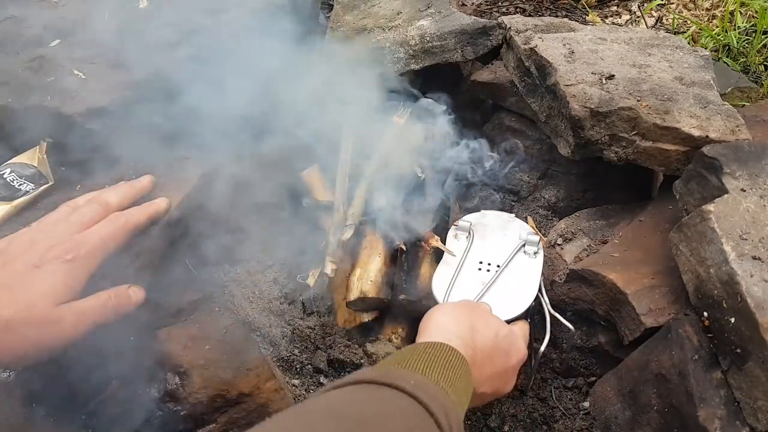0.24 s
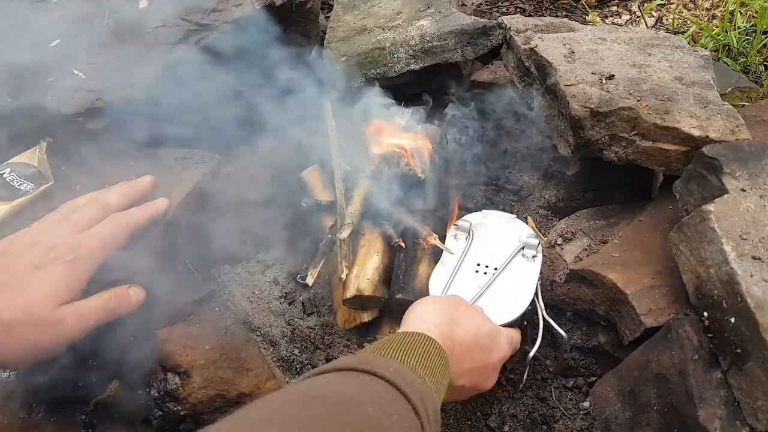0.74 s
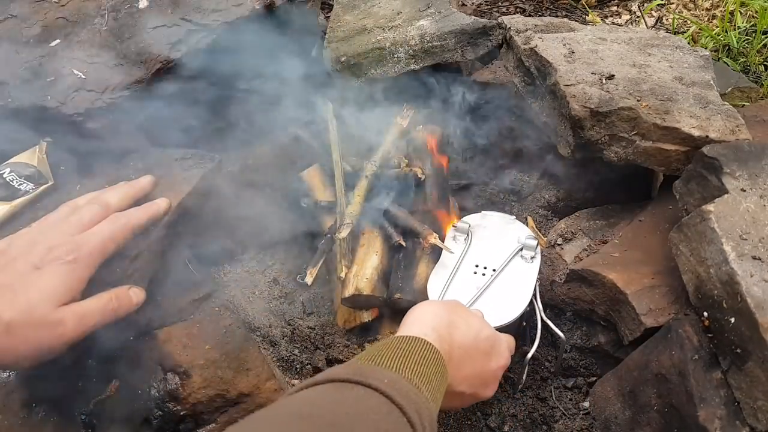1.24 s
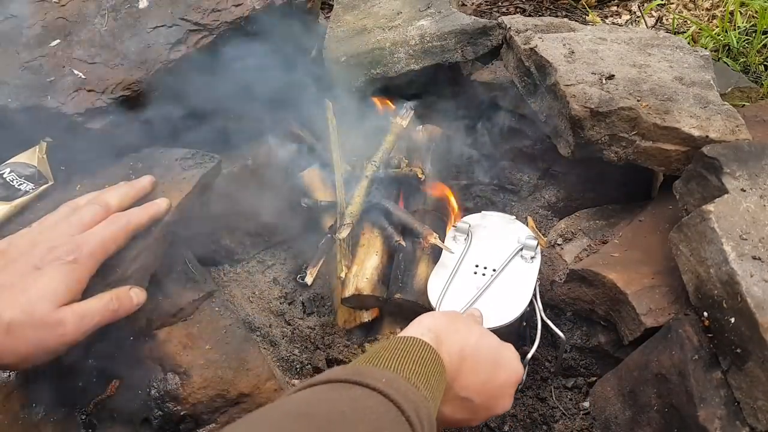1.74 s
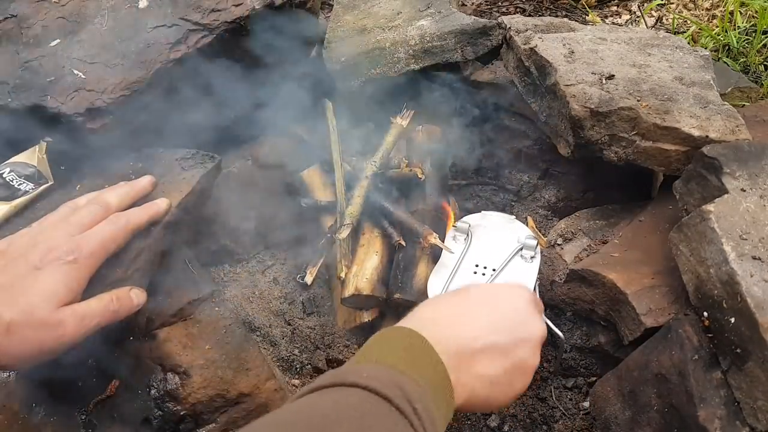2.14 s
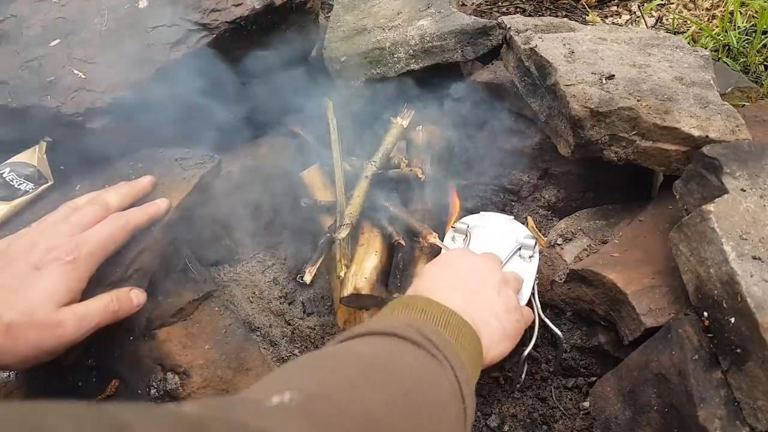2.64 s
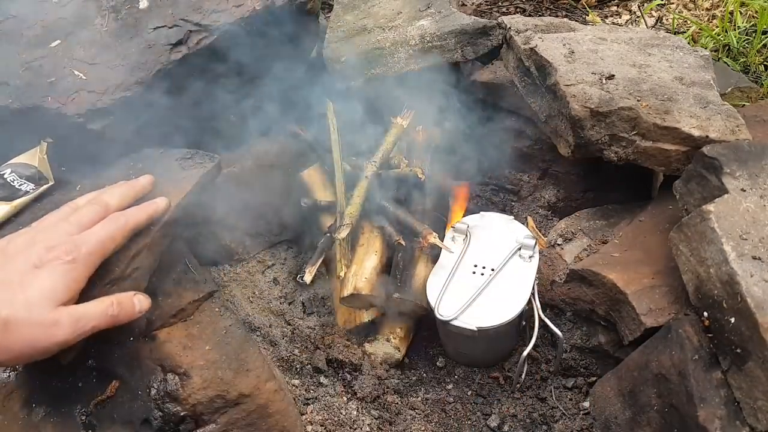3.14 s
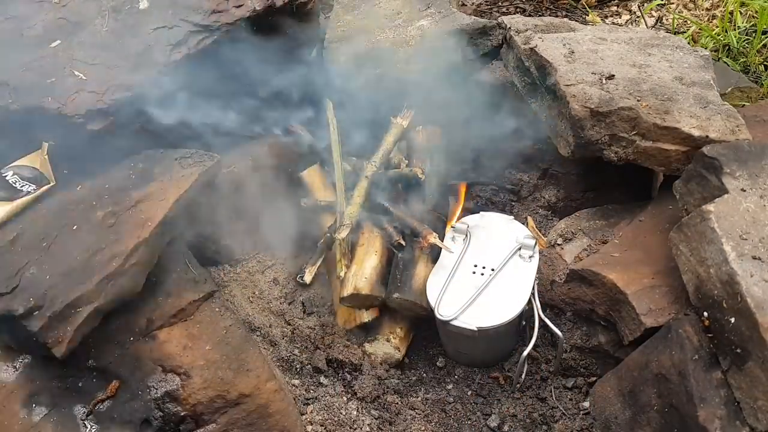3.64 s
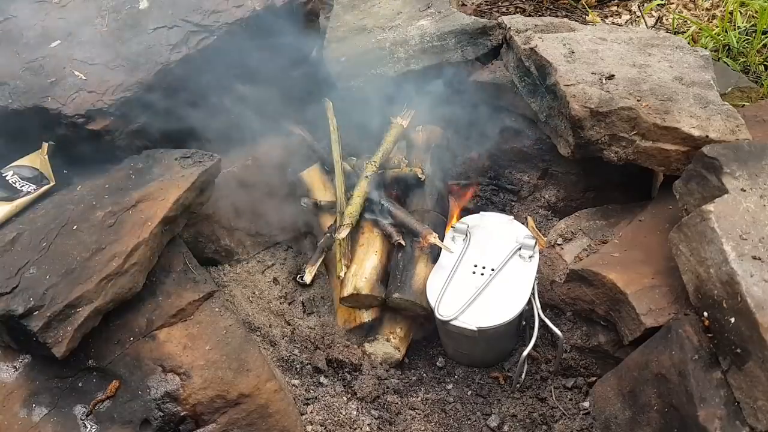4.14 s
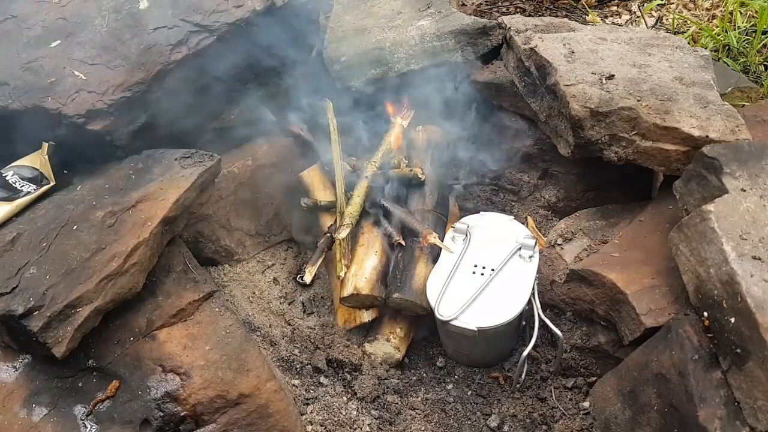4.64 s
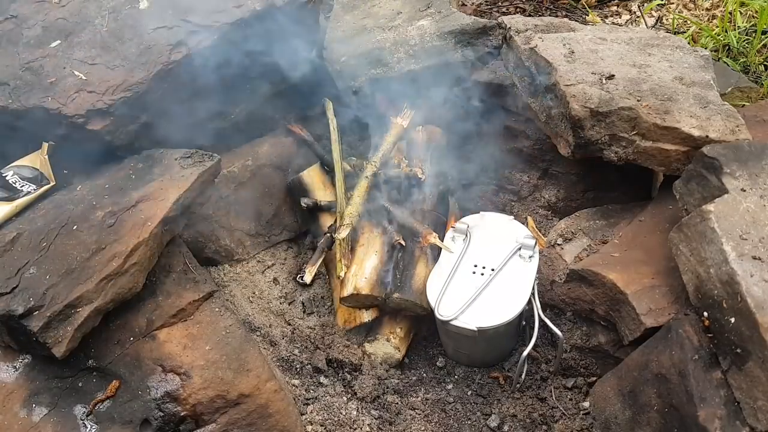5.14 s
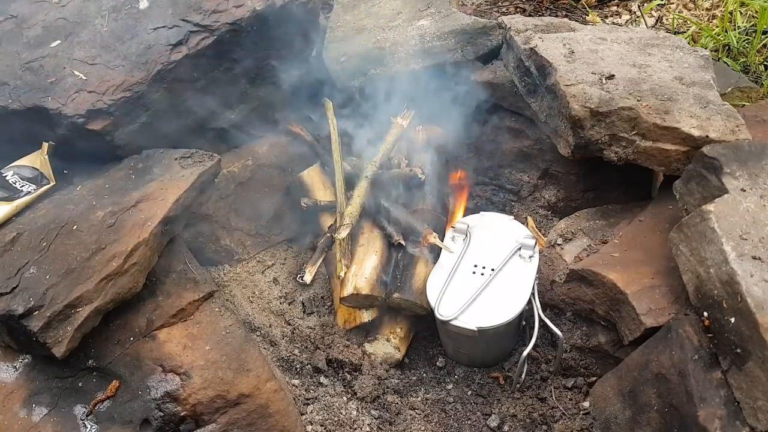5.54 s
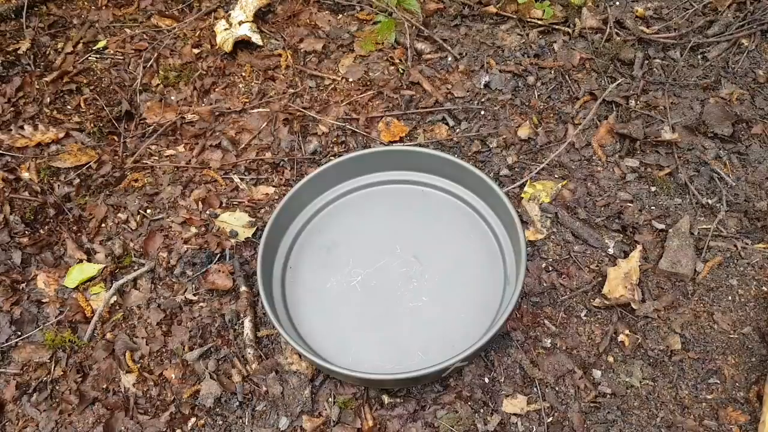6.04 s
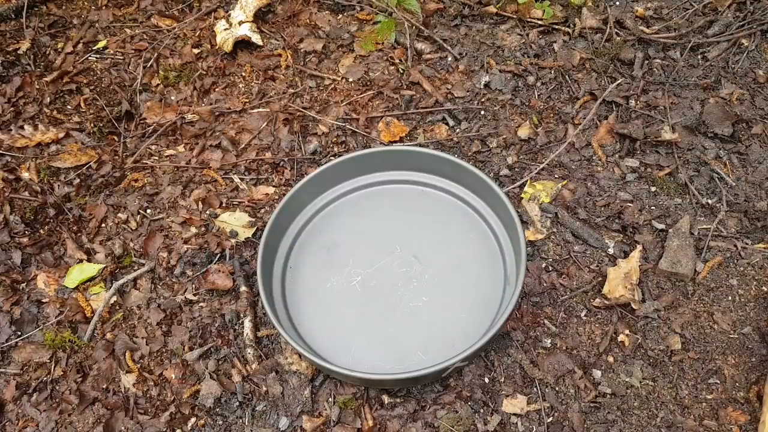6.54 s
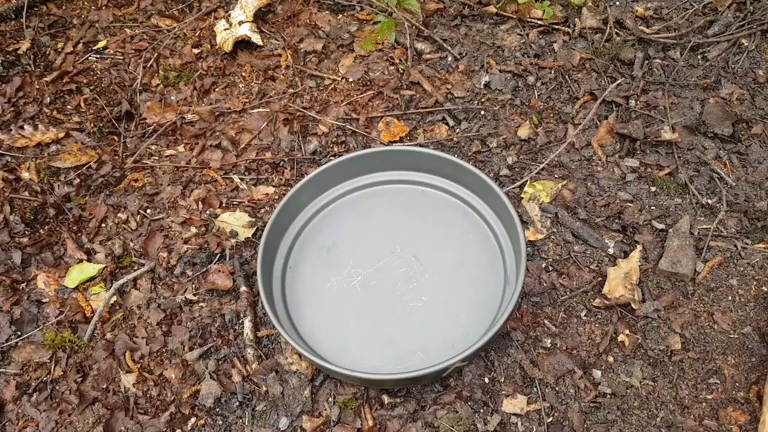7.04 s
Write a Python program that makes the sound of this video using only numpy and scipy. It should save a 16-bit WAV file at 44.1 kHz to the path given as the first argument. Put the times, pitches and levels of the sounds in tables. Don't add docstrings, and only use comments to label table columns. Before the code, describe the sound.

Outdoors in woodland, close stereo microphone beside a small hissing fire over low distant road rumble. A metal pot and its handle clink lightly, rattle at about one and two seconds, then tick softly. The hiss brightens, a hard thud with a woody snap hits, and a fly hums past faintly. After a blink of silence, quieter leaf hiss, far rumble and small bird chirps fade in.

```python
import sys
import numpy as np
from scipy import signal
from scipy.fft import rfft, irfft, next_fast_len
from scipy.io import wavfile
from scipy.ndimage import uniform_filter1d, map_coordinates

SR = 44100
rng = np.random.default_rng(int(sys.argv[2]) if len(sys.argv) > 2 else 0)


def inscribe(sig):
    pcm = np.round(np.clip(np.atleast_2d(sig).T, -1, 1) * 32767)
    wavfile.write(sys.argv[1], SR, pcm.astype(np.int16))


def volts_from_db(level):
    exponent = np.asarray(level, float) / 20
    return 10 ** exponent


N = 321930
CUT_S = 5.745
FIRESIDE, WOODS, THROUGHOUT = (0, CUT_S), (CUT_S, N / SR), (0, N / SR)


def unit(x):
    return x / np.sqrt(np.mean(x ** 2) + 1e-20)


def along(points, hz):
    f, v = np.transpose(points)
    return np.interp(np.log(hz + 1), np.log(f + 1), v)


def curve(rows):
    s, value = np.transpose(rows)
    return np.interp(np.arange(N) / SR, s, value)


def by_scene(fireside, woods):
    return np.where(np.arange(N) / SR < CUT_S, fireside, woods)


def wobble(rate):
    knots = rng.standard_normal(int(N * rate / SR) + 4)
    return map_coordinates(knots, [np.arange(N) * rate / SR])


def filtered(x, response):
    m = next_fast_len(x.shape[-1] + 8192)
    return irfft(rfft(x, m) * response(np.fft.rfftfreq(m, 1 / SR)), m)[..., :x.shape[-1]]


def resonance(f, hz, width):
    return 1j * f * width / (hz * hz - f * f + 1j * f * width)


def rush(spectrum, alike, lean, patchy_db, span):
    start, stop = (round(s * SR) for s in span)
    m = next_fast_len(stop - start)
    z = signal.stft(rng.standard_normal((2, m)), nperseg=512)[2]
    field = uniform_filter1d(rng.standard_normal(z.shape[1:]), size=5, axis=0)
    field = uniform_filter1d(field, size=10, axis=1)
    patchy = signal.istft(z * volts_from_db(patchy_db * unit(field)), nperseg=512)[1]
    a, b = rfft(patchy, m)
    hz = np.fft.rfftfreq(m, 1 / SR)
    turn = np.arccos(np.clip(along(alike, hz), -1, 1)) / 2
    mid, side = a * np.cos(turn), b * np.sin(turn)
    left = 2 / (1 + volts_from_db(-along(lean, hz)))
    ports = np.array([left * (mid + side), (2 - left) * (mid - side)])
    both = irfft(volts_from_db(along(spectrum, hz)) * ports, m)[:, :stop - start]
    return np.pad(both / np.std(both.mean(0)), ((0, 0), (start, N - stop)))


def add(track, s, sound):
    part = track[:, round(s * SR):round(s * SR) + sound.shape[-1]]
    part += sound[..., :part.shape[1]]


# (time [s], level [dB])
ROAD_SWELLS = [(0, -55), (.15, -56.5), (.55, -57), (.7, -51.5), (.99, -54.5), (1.21, -48.5), (1.55, -54),
               (2.05, -52), (3.37, -52.5), (3.74, -49.5), (4.35, -49), (4.6, -54), (5.5, -50.5), (6.2, -49),
               (6.49, -52.5), (6.64, -50), (6.91, -51), (7.3, -48.5)]
# (frequency [Hz], density [dB per Hz])
FIRESIDE_RUMBLE = [(15, -52), (28, -24), (42, -2), (60, 2), (120, -1.5), (200, -9.5), (260, -12.5),
                   (330, -17.5), (500, -22), (700, -55.5), (1100, -120)]
WOODS_DRONE = [(15, -50), (28, -33), (42, -6.5), (60, -0.5), (100, -4), (150, -13.5), (250, -18.5),
               (400, -42), (500, -36), (700, -48), (1100, -120)]
# (frequency [Hz], left-right likeness [-1 to 1])
LOW_LIKENESS = [(60, 1), (250, 0.8), (450, 0.59), (700, 0.054), (1050, -0.33), (1500, -0.1)]
# (frequency [Hz], left over right [dB])
LOW_BALANCE = [(60, 3.5), (250, 5.5), (450, 8), (700, 5.5), (1050, 3), (1500, 7)]


def far_road():
    low = rush(FIRESIDE_RUMBLE, LOW_LIKENESS, LOW_BALANCE, patchy_db=1.44, span=FIRESIDE)
    low += rush(WOODS_DRONE, LOW_LIKENESS, LOW_BALANCE, patchy_db=1.6, span=WOODS)
    return volts_from_db(curve(ROAD_SWELLS) + 0.71 * wobble(8)) * low


# (frequency [Hz], density [dB per Hz])
LEAF_SPECTRUM = [(1100, -17), (1900, -8.5), (2900, -7), (3500, -6), (4500, -4.5), (5400, -5.5),
                 (7000, -0.5), (8700, -14.5), (11300, -0.5), (13000, -8.5), (15800, -18)]
# (frequency [Hz], left over right [dB])
LEAF_BALANCE = [(2000, 5), (3400, -1.5), (5500, 8), (7000, 5), (11000, 3), (12500, 9), (13800, 26),
                (15000, 36.5)]


def leaves():
    return volts_from_db(-56) * rush(LEAF_SPECTRUM, [(2000, 0.031)], LEAF_BALANCE, patchy_db=0.9, span=WOODS)


def whistle(note, rough_db):
    s, hz, db = np.transpose(note)
    t = np.arange(s[0], s[-1], 1 / SR)
    flutter = rough_db * np.interp(t, np.linspace(s[0], s[-1], 12), rng.standard_normal(12))
    swell = volts_from_db(np.interp(t, s, db) + flutter + 2.5) * signal.windows.tukey(len(t), .15)
    return swell * np.sin(2 * np.pi * np.cumsum(np.interp(t, s, hz)) / SR)


# (share of length [0-1], pitch ratio, level [dB])
ARCH_SHAPE = [(0, .93, -7), (.38, 0.97, 0), (.62, .89, 1), (1, .83, -8)]
# (share of length [0-1], pitch ratio, level [dB])
DIP_SHAPE = [(0, 1.2, -9), (.35, 1, 2), (.8, 1.005, -2.5), (1, 1.05, -8)]
# (time [s], length [s], pitch [Hz], level [dB])
ARCH_CALLS = [
    (6.707, 0.048, 4950, -62.5),
    (6.839, .047, 4750, -59.5),
    (7.03, 0.06, 4800, -59),
    (7.185, .045, 4750, -58),
    (7.258, .04, 5050, -62),
]
# (time [s], length [s], pitch [Hz], level [dB])
DIP_CALLS = [
    (1.262, .055, 5400, -60),
    (2.19, 0.052, 5700, -57),
    (2.81, .019, 3670, -50.5),
    (2.828, 0.017, 3580, -51),
    (2.858, .036, 3730, -52),
    (2.953, 0.041, 3790, -50),
    (6.098, .03, 4330, -63),
    (6.17, .03, 4580, -61),
    (6.226, .045, 4250, -63),
    (7.08, 0.024, 4000, -62),
]


def birds():
    calls, t = np.zeros((2, N)), np.arange(SR // 5) / SR
    for shape, events in ((ARCH_SHAPE, ARCH_CALLS), (DIP_SHAPE, DIP_CALLS)):
        for s, length, hz, db in events:
            note = np.multiply(shape, [length, hz, 1]) + [s, 0, db]
            add(calls, s, whistle(note, rough_db=3.0))
    trunks = rng.standard_normal((2, len(t))) * volts_from_db(-60 * t / 0.19)
    echo = signal.fftconvolve(calls, trunks / np.linalg.norm(trunks[0]), axes=1)[:, :N]
    return calls * volts_from_db([[0.3], [-2.7]]) + volts_from_db(-3) * echo


# (time [s], pitch [Hz], level [dB])
FLY_PASS = [
    (4.88, 322, -78),
    (4.95, 320, -61.5),
    (5.2, 325, -66.5),
    (5.3, 339, -68),
    (5.34, 340, -83),
]


def fly():
    out = np.zeros((2, N))
    add(out, FLY_PASS[0][0], whistle(FLY_PASS, rough_db=-0.5))
    return out * volts_from_db([[2.5], [-2.5]])


# (time [s], level [dB])
STAND_KNOCKS = [
    (.266, -37),
    (3.2772, -14),
    (3.626, -36),
    (4.301, -38),
]


def stand():
    out, t = np.zeros((2, N)), np.arange(SR // 10) / SR
    glide = np.sin(2 * np.pi * 1.35 * np.log(1 + t / .0024))
    wave = glide * (1 - np.exp(-(t / .0012) ** 2))
    for s, db in STAND_KNOCKS:
        shudder = unit(filtered(rng.standard_normal(len(t)), lambda f: resonance(f, 600, 300)))
        shudder *= volts_from_db(-17) * (1 - np.exp(-t / .002))
        thud = volts_from_db(db - 60 * t / .038) * (wave + shudder)
        thud = filtered(thud, lambda f: f ** 2 / (f ** 2 + 75 ** 2) / (1 + (f / 1500) ** 4))
        add(out, s, thud * volts_from_db([[3], [-4]]))
    return out


# (time [s], level [dB], pitch [Hz], t60 [s], width [Hz])
TWIG_SNAPS = [
    (3.2878, -15, 1780, .006, 497),
    (7.1007, -24, 10300, 0.0085, 6040),
]


def twigs():
    out, t = np.zeros((2, N)), np.arange(SR // 20) / SR
    for s, db, hz, t60, width in TWIG_SNAPS:
        burst = volts_from_db(db - 60 * t / t60) * rng.standard_normal((2, len(t)))
        add(out, s, filtered(burst, lambda f: resonance(f, hz, width)))
    return out


# (time [s], level [dB])
BURN_STRENGTH = [(0, -1), (.29, 0.5), (.55, -3), (.8, -1.5), (1.21, 0.5), (1.6, -3), (2.05, 1), (3.02, 0),
                 (3.37, 4), (4.35, 3), (4.6, 1.1), (5.3, 2), (5.7, 3)]
# (frequency [Hz], density [dB per Hz])
ROAR_SPECTRUM = [(210, -29), (350, -3), (431, -1.5), (590, -3.5), (874, -1), (1630, -10), (2200, -18.5),
                 (2860, -39), (4840, -120)]


def flames():
    roar = rush(ROAR_SPECTRUM, LOW_LIKENESS, LOW_BALANCE, patchy_db=1.0, span=THROUGHOUT)
    roar_db = by_scene(-63 + curve(BURN_STRENGTH), -60)
    flicker_db = .8 * wobble(6)
    return volts_from_db(roar_db + flicker_db) * roar


# (time [s], level [dB])
BOIL = [(0, -47), (.3, -47), (.6, -48.5), (.99, -49), (1.21, -47.5), (1.55, -49), (2.05, -48),
        (2.55, -50.5), (2.8, -49.5), (3.02, -46), (5.7, -46.5)]
# (time [s], open share [0-1])
ARM_OPENING = [
    (0, 0.03),
    (2.75, .05),
    (3.0, 0.89),
    (4.2, 0.93),
    (5.7, 0.94),
]
# (frequency [Hz], density [dB per Hz])
SHADED_STEAM = [(1060, -50.5), (1800, -17.5), (2910, -12), (3310, -7.5), (3590, -12), (4040, -6),
                (5260, -8), (6430, -3.5), (6970, -0.5), (8140, -13), (11800, 0), (15000, -9), (15800, -9.5)]
CLEAR_STEAM = [(1060, -50), (1800, -15), (2540, -10.5), (3310, -4.5), (3620, -6), (4670, -3.5), (5920, -4),
               (7360, -1), (8520, -9.5), (9670, -3), (10900, 3), (14800, -4), (15800, -10)]
# (frequency [Hz], left-right likeness [-1 to 1])
SHADED_LIKENESS = [(2000, .15), (4000, 0.21), (6000, -0.037), (8500, 0.17), (11000, -0.27), (15000, -.2)]
CLEAR_LIKENESS = [(2200, -0.054), (3400, 0.58), (4800, 0.56), (6300, .3), (8200, 0.63), (10000, -0.078),
                  (12300, -0.2), (15000, -.15)]
# (frequency [Hz], left over right [dB])
PORT_BALANCE = [(2000, 6.5), (2600, 8), (3500, 2.5), (5000, 2), (6900, 5), (7800, 9), (8800, -2),
                (11200, -3.5), (12500, -1), (13800, 2.5), (15500, -6)]


def steam():
    share = np.clip(curve(ARM_OPENING), 0, 1)
    shaded = rush(SHADED_STEAM, SHADED_LIKENESS, PORT_BALANCE, patchy_db=1.6, span=FIRESIDE)
    clear = rush(CLEAR_STEAM, CLEAR_LIKENESS, PORT_BALANCE, patchy_db=0.72, span=FIRESIDE)
    hiss = np.sqrt(1 - share) * shaded + np.sqrt(share) * clear
    sputter_db = 0.21 * wobble(9.8) + 0.45 * wobble(150)
    return volts_from_db(curve(BOIL) + sputter_db) * hiss


# (time [s], rattle [dB], body knock [dB], rattle t60 [s], brightness [dB per octave])
POT_CONTACTS = [(.270, -47, -46, 0.13, -2.5), (1.015, -35.5, -52, 0.045, 6.5),
                (1.1144, -20, -52, 0.032, 3.5), (1.1162, -25.5, -26, 0.073, -2),
                (1.853, -56, -37.5, .03, -5), (2.109, -31.5, -39, 0.058, -4.5),
                (2.115, -20.5, -27, 0.049, -1.5), (2.121, -21.5, -42, 0.076, -1),
                (2.1295, -27.5, -24.5, 0.032, -3), (2.134, -27.5, -27, 0.096, -0.5),
                (2.4128, -39.5, -50, 0.038, 11.5), (2.419, -33.5, -55, 0.027, 5),
                (2.573, -30, -39.5, 0.027, 5)]
# (frequency [Hz], level [dB], t60 [s])
WALL_MODES = [(190, -6.5, 0.021), (290.7, -12, 0.12), (318, -13.5, 0.13), (340, 4, 0.025),
              (478, -12.5, 0.035), (785, -13, 0.01)]
# (frequency [Hz], width [Hz], level [dB])
LID_MODES = [(1270, 360, 3), (1724, 97, 7), (2210, 680, -5.5), (3295, 150, 5.5), (4350, 1000, -2),
             (5620, 530, 2), (6670, 1010, 1.5), (11600, 1460, 1.5), (14000, 3400, -7.5)]


def lid(f):
    return sum((-1) ** k * volts_from_db(db) * resonance(f, hz, width) for k, (hz, width, db) in enumerate(LID_MODES))


def pot():
    out, t = np.zeros((2, N)), np.arange(SR // 9) / SR
    for s, rattle_db, knock_db, t60, bright_db in POT_CONTACTS:
        grit = rng.standard_normal((3, len(t)))
        scatter = 0.58 * grit[0] + 0.52 * grit[1:]
        burst = volts_from_db(rattle_db - 60 * t / t60) * (1 - np.exp(-t / 0.00021)) * scatter

        def color(f):
            tilt_db = bright_db * np.log2((f + 100) / 6000)
            return lid(f) * volts_from_db(tilt_db + [[.4], [-.6]] * along(PORT_BALANCE, f))

        add(out, s, filtered(burst, color))
        ring = np.zeros(len(t))
        for hz, db, life in WALL_MODES:
            level_luck, pitch_luck = rng.standard_normal(2)
            tone = np.sin(2 * np.pi * hz * (1 + 0.039 * pitch_luck) * t)
            ring += volts_from_db(db + 2 * level_luck - 60 * t / life) * tone
        add(out, s, volts_from_db(knock_db) * ring * (1 - np.exp(-t / 0.0016)) * volts_from_db([[3.5], [-5]]))
    return out


def scene():
    background = far_road() + leaves() + birds() + fly()
    return background + stand() + twigs() + flames() + steam() + pot()


def low_pass(x):
    return signal.sosfilt(signal.butter(12, 15600, fs=SR, output="sos"), x)


def record(dry):
    t = np.arange(N) / SR
    out = volts_from_db(-60 * np.clip(t - 5.705, 0, 1) / .015)
    back = np.clip((t - CUT_S) / .255, 0, 1) ** 2.25
    mix = filtered(dry, lambda hz: hz < 15600) * (out + back)
    return low_pass(mix)


dry = scene()
out = record(dry)
inscribe(out)
```